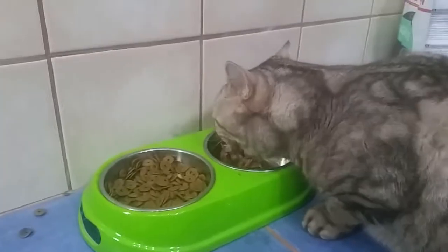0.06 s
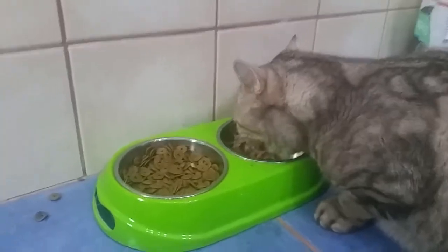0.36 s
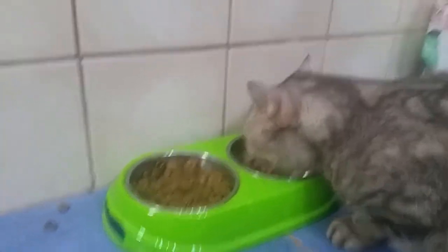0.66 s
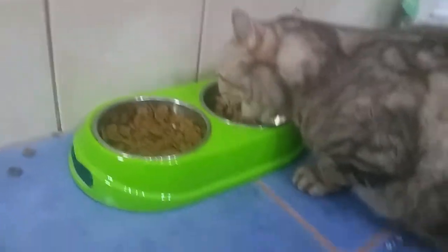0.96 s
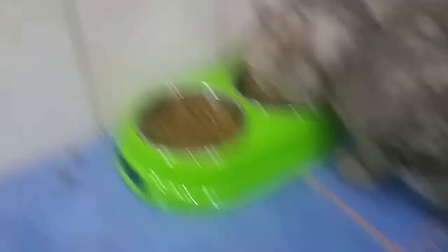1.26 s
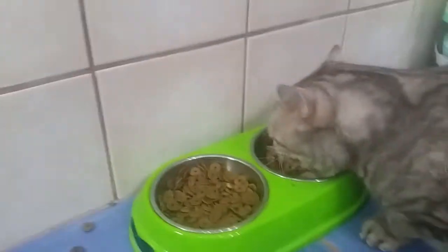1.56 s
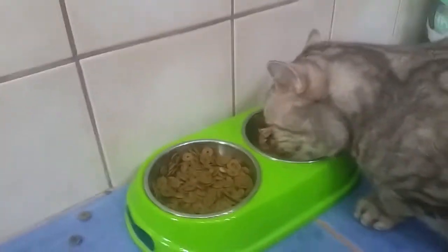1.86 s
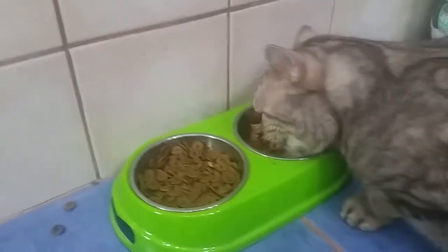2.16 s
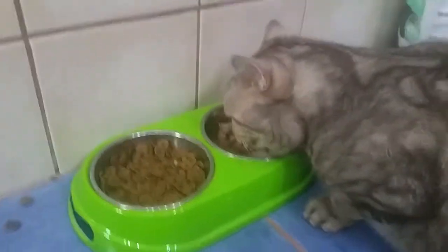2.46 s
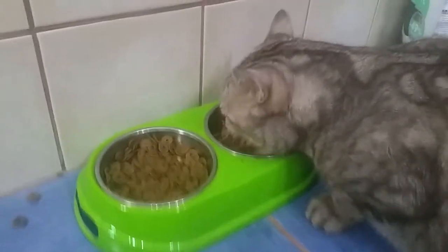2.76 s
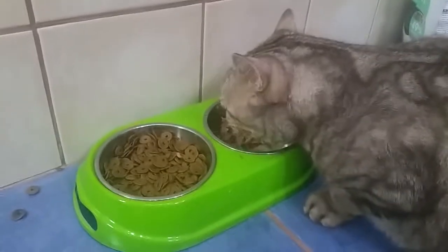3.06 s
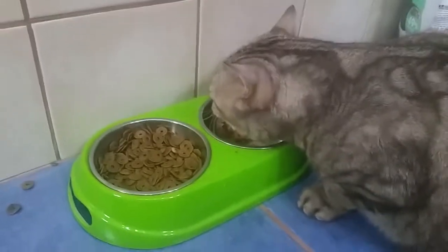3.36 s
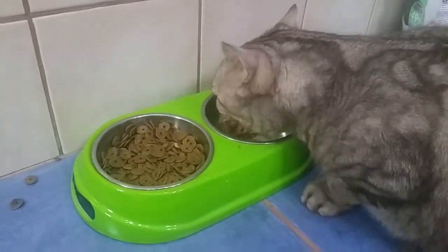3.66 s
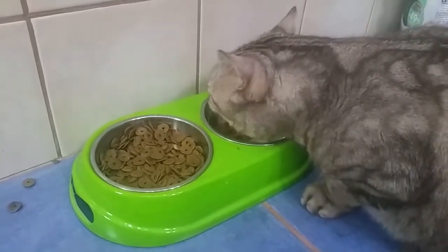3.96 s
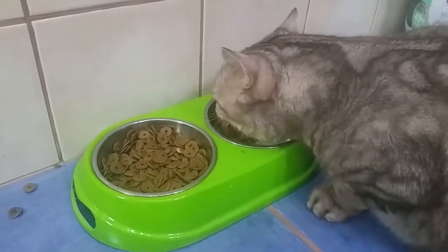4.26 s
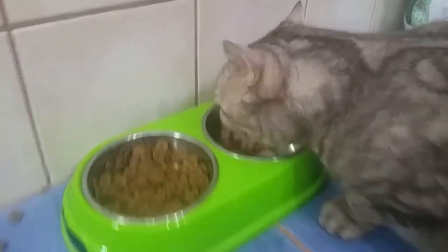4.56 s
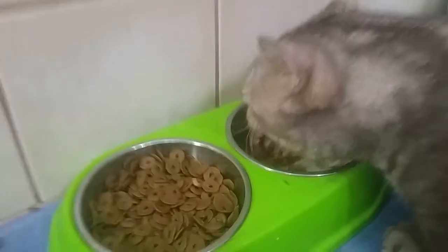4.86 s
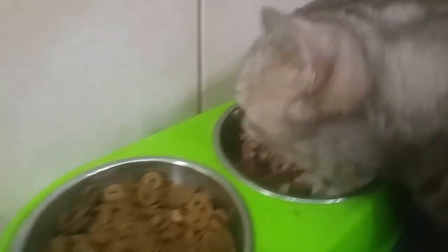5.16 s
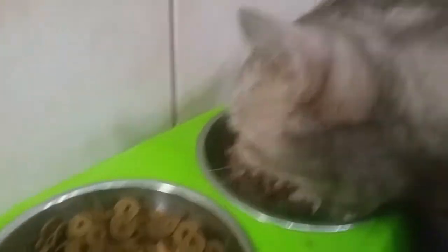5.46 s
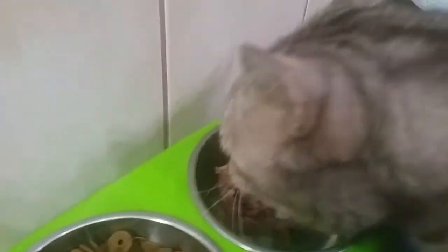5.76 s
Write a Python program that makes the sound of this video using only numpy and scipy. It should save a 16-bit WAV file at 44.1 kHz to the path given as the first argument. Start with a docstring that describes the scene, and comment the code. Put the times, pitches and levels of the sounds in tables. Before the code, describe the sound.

Loud, close microphone handling with rubs and thumps covers the faint ticks of a cat eating kibble, over soft hiss.

```python
"""Fingers on a phone, a cat eating

A cat eats quietly from a steel bowl in a tiled room: kibble (dry food) ticks and scrapes in the bowl.
Far louder, fingers shift on a hand-held phone. They rub, stick and slip, squeak and bump beside its
two microphone holes, called ports. A small metal part pings now and then over a soft, steady hiss."""
import sys
import numpy as np
from scipy import signal
from scipy.fft import rfft, irfft, next_fast_len
from scipy.io import wavfile
from scipy.ndimage import uniform_filter1d, map_coordinates

SR = 44100
rng = np.random.default_rng(int(sys.argv[2]) if len(sys.argv) > 2 else 0)


def transcribe(u):
    """Save the signal u as a 16-bit wav file named by the first command-line argument.

    u: samples, shape (n,) or (channels, n), limited to [-1, 1]; the rate is SR.
    q: integer samples, one column per channel.
    """
    v = np.clip(np.atleast_2d(u).T, -1, 1)
    q = np.round(v * 32767).astype(np.int16)
    wavfile.write(sys.argv[1], SR, q)


N = 265566

# Levels are relative: later gains set the mix. A ring_s is the time a sound takes to fade by 60 dB.
# A pan_db is left minus right, so a positive one leans left.

# tone of the room and microphone hiss: frequency_hz, left_db, right_db
HISS_TONE = [(25, 5.5, -1), (60, 1.5, 2), (148, -11, -5), (413, -19, -17), (770, -23, -27.5),
             (1300, -37.5, -40.5), (2000, -21, -31), (2660, -29.5, -34.5), (3220, -20.5, -30),
             (3960, -10, -29), (4850, -29.5, -32), (5860, -42, -45.5), (8500, -54.5, -58.5),
             (12000, -40.5, -53.5), (15500, -40.5, -44)]
# the hiss swells and sinks: time_s, level_db
HISS_SWELL = [(0, -9), (.4, 5.5), (1.5, 7.5), (2.2, 2.5), (2.7, 9), (3.5, 3.5), (4.2, -3), (4.7, 6.5),
              (6, 7.5)]
# how long the tiled walls echo: frequency_hz, ring_s
TILE_ECHO = [(300, 0.44), (4000, 0.27), (7000, 0.72), (14000, 0.68)]
# jolts of a small metal part: start_s, level_db
PINGS = [(1.6898, -43), (2.121, -44.5), (2.3715, -36.5)]
# the notes that part rings with: pitch_hz, level_db, ring_s
METAL_NOTES = [(12630, -7, .12), (13388, -5.5, .3)]
# teeth and kibble hit the bowl: start_s, level_db, fade_s
KIBBLE_HITS = [(2.7163, -25.5, 0.0022), (2.7198, -26, 0.003), (2.725, -19.5, 0.0025),
               (2.891, -35.5, 0.0045), (2.917, -42.5, .014), (2.959, -46, .01), (2.981, -37.5, 0.0043),
               (3.0904, -35, 0.0017), (3.356, -46, 0.0056), (3.457, -49.5, 0.025), (4.051, -51, 0.0025)]
# tone of the food-filled steel bowl: frequency_hz, level_db
BOWL_TONE = [(500, -39), (1900, -13.5), (2900, -24.5), (3700, -8.5), (4150, -0.5), (5000, -5.5),
             (6000, -6.5), (7500, -10.5), (8400, -27), (16000, -50.5)]

# how each port colours the sound: frequency_hz, left_db, right_db
PORT_TONE = [(928, -1.5, -4), (2547, -8.5, -2.5), (3830, 2.5, 6.5), (5200, -11.5, -0.5), (8530, -19.5, -16),
             (11100, -7, 3), (15000, 2, 5.5)]
# tones of rubbing skin, from deep rumble to bright fizz: frequency_hz, level_db
RUMBLE_TONE = [(15, -25), (40, 2.5), (130, 3), (220, -4), (400, -16), (1200, -74.5)]
SKIN_TONE = [(100, -24), (280, -3), (450, -0.5), (800, -12), (1400, -24.5), (3000, -59.5)]
LEFT_SWISH_TONE = [(300, -10.5), (900, 1.5), (1600, 9), (2600, 1.5), (4000, -5.5), (6000, -28),
                   (15000, -36.5)]
RIGHT_SWISH_TONE = [(30, 6), (200, 6), (700, 4), (1700, -1.5), (2800, -10.5), (4200, -18.5), (7000, -30.5),
                    (15000, -37.5)]
FIZZ_TONE = [(2000, -29), (5000, -1.5), (8000, -1.5), (12000, -3.5), (16000, -2)]
# tones of a scuff and of the rasp in a squeak: frequency_hz, level_db
SCUFF_TONE = [(300, 4.5), (1500, 1), (4000, -6.5), (8000, 3), (15000, -16.5)]
RASP_TONE = [(200, -5.5), (1100, 3), (2000, -8), (4000, -22.5), (8000, -40.5)]
# in a bump, soft flesh dulls the treble and the leaky port drains the bass: frequency_hz, level_db
BUMP_TONE = [(20, -18), (200, -1), (500, 0), (4200, -2.5), (8000, -2), (15000, -8.5)]
# the holding hand never quite rests: time_s, rumble_db
GRIP = [(0, -53), (1.5, -59.5), (2.25, -60), (2.55, -50.5), (3.1, -55.5), (3.6, -69), (4.42, -73),
        (4.75, -52), (6, -47)]
# one long drag of the fingers over the case: time_s, rub_db, swish_db, fizz_db
DRAG = [(0, -40, -63, -93), (.29, -52.5, -68.5, -96), (.35, -39, -64.5, -84.5), (.43, -40.5, -56, -68),
        (.52, -22.5, -41, -54), (.57, -23, -41.5, -53), (.615, -39, -47, -62.5), (.665, -22.5, -48.5, -57),
        (.71, -47, -61, -69), (.77, -41, -54, -66.5), (.87, -26.5, -50.5, -67.5),
        (.89, -29.5, -41.5, -66.5), (.97, -19.5, -44.5, -65), (1.03, -29.5, -47, -66.5),
        (1.2, -26, -41.5, -54), (1.23, -36.5, -37, -53.5), (1.305, -39.5, -34, -44.5),
        (1.335, -26.5, -35.5, -46), (1.368, -18, -27, -47), (1.385, -51.5, -59, -59.5),
        (1.5, -71, -61, -68), (2, -84.5, -91.5, -95)]
# short finger strokes: peak_s, rise_s, fall_s, rub_db, rub_pan_db, swish_db, fizz_db
STROKES = [(1.645, .04, .07, -50.5, 2, -65, -65.5), (2.04, .035, .045, -50.5, -2.5, -76, -58.5),
           (2.41, .02, .04, -51, 4.5, -61.5, -58.5), (2.5, .04, .06, -48, 1, -71, -70),
           (2.98, .035, .035, -45, 0, -57, -68), (3.37, 0.048, .035, -51, 2.5, -67, -71),
           (4.585, .025, 0.062, -37, -18, -62, -57.5), (4.72, 0.043, .045, -39, 25, -54, -58.5),
           (4.901, 0.076, .035, -37.5, 25, -46, -62), (5.14, 0.027, .04, -41, 17, -54.5, -68),
           (5.22, 0.029, 0.036, -42, 12, -58, -63.5), (5.409, 0.082, .045, -44.5, 17, -42.5, -87),
           (5.62, 0.042, .04, -43, 21, -45, -67.5), (5.733, 0.042, .05, -47.5, 20, -41, -83)]
# dry skin scuffs the right port: peak_s, level_db, half_length_s
SCUFFS = [(0.561, -47, 0.0054), (1.2513, -24.5, 0.00036), (2.375, -39.5, 0.0019), (2.385, -33.5, 0.0046),
          (2.985, -48, 0.0069), (4.5145, -32.5, 0.0008), (4.53, -26.5, 0.00092), (4.553, -48, 0.014),
          (4.597, -41.5, 0.033), (4.637, -35.5, 0.002), (5.5642, -38, 0.00079)]
# a fingertip squeaks across the left port, one list per squeak: time_s, pitch_hz, level_db
SQUEAKS = [
    [(.503, 620, -20), (.515, 768, -24), (.53, 683, -26.5)],
    [(.952, 460, -30.5), (.971, 546, -14.5), (.984, 462, -42), (1.005, 430, -23.5)],
    [(1.314, 240, -15), (1.326, 328, -12), (1.338, 439.6, -9), (1.346, 710, -15), (1.354, 908, -10.5),
     (1.36, 1108, -19), (1.371, 1426, -23)],
]
# a fingertip sticks and slips in runs:
# start_s, slip_count, first_gap_s, gap_ratio, first_slip_db, growth_per_slip_db, pan_db, snap_vs_swing_db
SLIP_RUNS = [(.4345, 10, .012, 1, -16.5, 0.14, 4, -8), (0.5574, 3, 0.013, 1.05, -2, 0.5, 8, -4.5),
             (0.6401, 5, 0.0077, 1.21, -3, 0.62, 7.5, -1), (.705, 2, .016, 1, -13.5, 8, 18, -13.5),
             (1.0583, 2, .0218, 1, -15.5, 5, -1, 0), (1.1078, 6, .011, .9, -13, 1.5, 2.5, 1)]
# the notes the phone's case rings with: pitch_hz, level_db, ring_s
CASE_NOTES = [(417.3, 0.5, 0.056), (540, -4.5, 0.035), (810, -6, 0.032), (970, -10, 0.021),
              (1374, -4, 0.016), (1650, -10, 0.036), (2120, -23, 0.025)]
# fingers bump the case: start_s, swing_hz, swing_db, pan_db, snap_corner_hz, snap_db
BUMPS = [(1.036, 403, -15, 30, 400, -18.5), (1.1945, 140, -5, 34, 203.3, -6),
         (1.238, 82.5, -10, 35, 1000, -21), (1.2521, 300, -38, 18, 1300, -13.5),
         (1.3138, 248, 1.5, 46, 201, 0), (1.6411, 152, -28, -5.5, 890, -29),
         (2.3678, 104, -0.5, -19, 300, -9.5), (2.3706, 350, -14, -6, 301, -25),
         (2.3713, 121, 2, -18, 503, -9), (2.3843, 88, -1.5, -14.5, 650, -14),
         (2.5276, 70.8, 1.5, 22, 195, -9.5), (2.5644, 60, -22.5, 7.5, 538, -36),
         (2.748, 290, -29.5, 6, 325, -25.5), (2.8672, 77.5, 2.5, 9.5, 2280, -19),
         (2.8922, 95, -12, -30, 876, -25), (2.962, 103, -9, -18.5, 1330, -36),
         (2.9885, 204, -25.5, -3.5, 1474, -36), (3.038, 250, -33.5, 2, 600, -50),
         (3.2756, 80, .5, 6, 2600, -18.5), (3.3676, 110, -28, -1, 2100, -27),
         (4.271, 248.2, -54, -13.5, 420, -42.5), (4.443, 206.5, -36, -20.5, 1920, -38),
         (4.5224, 99, -25, -15, 780, -20), (4.5289, 166, -3, -15.5, 186, -4.5),
         (4.631, 156, -11.5, -31, 530, -12.5), (4.6355, 97, -20, 1, 700, -10.5),
         (4.6852, 467, -20, 30, 201, -13.5), (4.7006, 420, -33, 26, 456, -9.5),
         (4.865, 170, -24, 31, 540, -24), (4.878, 96.5, -23, -18, 1147, -29),
         (5.0012, 400, -62, 19, 405, -25), (5.0991, 137, -31, -13, 262, -22.5),
         (5.133, 78, -16.5, 34, 240, -13.5), (5.1978, 447, -27, 24, 300, -20.5),
         (5.3, 79, -20, 31, 1146, -30), (5.5501, 456, -47, 0, 213, -22.5), (5.5565, 394, -9, 23, 377, -3.5),
         (5.568, 109, -15.5, 30, 200, -17), (5.599, 565, -27, 27, 203, -11),
         (5.813, 59.6, -29, 20, 200, -48), (5.851, 127, -23.5, 25, 405, -20),
         (6.0083, 118, -28, 15, 1891, -34.5)]


def amp(db):
    """Turn decibels into a gain to multiply by."""
    return 10 ** (np.asarray(db) / 20)


def unit(x):
    """Scale a sound to an average (rms) strength of 1."""
    return x / np.sqrt(np.mean(x ** 2) + 1e-20)


def along(points, hz, column=1):
    """Read a table between its rows, with frequency spaced in octaves."""
    table = np.transpose(points)
    return np.interp(np.log(hz + 1), np.log(table[0] + 1), table[column])


def per_port(points, hz):
    """Left and right gains from a tone table."""
    return amp([along(points, hz, 1), along(points, hz, 2)])


def pan(pan_db):
    """Left and right gains: the nearer port gets it all, the other gets less."""
    return amp([[min(pan_db, 0)], [min(-pan_db, 0)]])


def curves(rows):
    """Join a table's points in time: one curve for each column after the first."""
    times, *columns = np.transpose(rows)
    return [np.interp(np.arange(N) / SR, times, column) for column in columns]


def wobble(rate):
    """A smooth curve through `rate` random points a second."""
    points = rng.standard_normal(int(N * rate / SR) + 4)
    return map_coordinates(points, [np.arange(N) * rate / SR])


def filtered(x, response):
    """Multiply each frequency in a sound by response(hz)."""
    size = 2 * next_fast_len(N // 2 + SR // 4)
    return irfft(rfft(x, size) * response(np.fft.rfftfreq(size, 1 / SR)), size)[..., :N]


def causal(gain):
    """Turn gains into a filter that never sounds before the hit (minimum phase)."""
    cepstrum = irfft(np.log(gain))
    half = cepstrum.shape[-1] // 2
    cepstrum[..., 1:half] *= 2
    cepstrum[..., half + 1:] = 0
    return np.exp(rfft(cepstrum))


def add(track, start_s, sound):
    """Mix a sound into a track from start_s on."""
    part = track[..., round(start_s * SR):][..., :sound.shape[-1]]
    part += sound[..., :part.shape[-1]]


def hiss():
    """Room murmur and microphone hiss, slowly swelling and sinking."""
    noise = filtered(rng.standard_normal((2, N)), lambda hz: per_port(HISS_TONE, hz))
    return amp(-59.5 + curves(HISS_SWELL)[0]) * unit(noise)


def whine(pitch_hz=14000, width_hz=110):
    """A faint, thin whine: a narrow band of very high noise."""
    noise = rng.standard_normal((2, N))
    return amp(-88.5) * unit(filtered(noise, lambda hz: np.exp(-((hz - pitch_hz) / width_hz) ** 2)))


def room_echo(x):
    """The tiled walls throw a sound back, differently at each port."""
    hz, t, spectrum = signal.stft(rng.standard_normal((2, SR)), SR, nperseg=256)
    fade = amp(-60 * t / along(TILE_ECHO, hz)[:, None])
    tail = signal.istft(spectrum * fade, SR, nperseg=256)[1]
    return signal.fftconvolve(x[None], tail / np.linalg.norm(tail[0]), axes=1)[:, :N]


def metal_pings():
    """A tiny metal part ticks and rings very high after each jolt."""
    out, t = np.zeros(N), np.arange(SR // 2) / SR
    ring = sum(amp(db - 60 * t / ring_s) * np.sin(2 * np.pi * hz * t) for hz, db, ring_s in METAL_NOTES)
    for start_s, db in PINGS:
        bright_noise = np.diff(rng.standard_normal(len(t) + 3), 3)
        tick = .1 * np.exp(-t / .004) * bright_noise
        add(out, start_s, amp(db) * (ring + tick))
    return out * amp([[-9], [-3]])


def rim_clink(start_s=.1405, pitch_hz=2300, ring_s=.25):
    """A light touch makes the bowl's bare rim ring."""
    out, t = np.zeros(N), np.arange(SR // 2) / SR
    tick = 8 * np.exp(-t / .003) * rng.standard_normal(len(t))
    ring = amp(-60 * t / ring_s) * np.sin(2 * np.pi * pitch_hz * t)
    add(out, start_s, amp(-61) * (ring + uniform_filter1d(tick, size=8)))
    return out


def nibbles(per_second=5.7, level_db=-58.5, spread_db=3, fade_s=.0015):
    """Faint ticks of food at random moments: start_s, level_db, fade_s."""
    draws = rng.random((round(per_second * N / SR), 2))
    return [(when * N / SR, level_db + spread_db * (2 * size - 1), fade_s) for when, size in draws]


def kibble():
    """Short grainy scrapes in the steel bowl; the food stops it from ringing on."""
    scrapes, t = np.zeros(N), np.arange(SR // 8) / SR
    for start_s, db, fade_s in KIBBLE_HITS + nibbles():
        add(scrapes, start_s, amp(db) * rng.standard_normal(len(t)) * np.exp(-t / fade_s))
    scrapes *= amp(3.5 * wobble(700))
    return amp(7.5) * filtered(scrapes, lambda hz: causal(amp(along(BOWL_TONE, hz))))


def friction(tone, grain_db, grain_rate):
    """Noise that comes in clumps, as skin ridges catch and let go."""
    grains = rng.standard_normal(N) * amp(grain_db * wobble(grain_rate))
    return unit(filtered(grains, lambda hz: amp(along(tone, hz))))


def low_rub(rumble_gain, skin_gain):
    """Skin right on a port: the case rumbles under a grainy rub."""
    rumble = rumble_gain * friction(RUMBLE_TONE, grain_db=0, grain_rate=66)
    return rumble + skin_gain * friction(SKIN_TONE, grain_db=3, grain_rate=150)


def stroke_gains():
    """Each stroke swells and dies away: gains of left rub, right rub, swish and fizz."""
    t, gains = np.arange(N) / SR, np.zeros((4, N))
    for peak_s, rise_s, fall_s, rub_db, pan_db, swish_db, fizz_db in STROKES:
        from_peak = np.abs((t - peak_s) / np.where(t < peak_s, rise_s, fall_s))
        peaks = np.vstack([amp(rub_db) * pan(pan_db), amp(swish_db), amp(fizz_db)])
        gains += peaks * np.exp(-from_peak ** 1.5)  # power 1 is a pointed swell, 2 a rounded one
    return gains


def rubbing():
    """Drag, strokes and grip all slide skin over the ports; the left one is nearly covered."""
    drag = amp(curves(DRAG))
    grip = amp(curves(GRIP)[0] + 2 * wobble(8.1))
    left_rub, right_rub, stroke_swish, stroke_fizz = stroke_gains()
    strokes = np.array([left_rub, stroke_swish, stroke_fizz])
    resting = amp([[-11], [-15], [-29]]) * grip  # rub, swish, fizz
    skin, swish, fizz = np.sqrt(drag ** 2 + strokes ** 2 + resting ** 2)
    drag_flex, stroke_flex = amp(7), amp(1.5)  # a firm drag bends the case more, so it rumbles more
    close_rub = low_rub(drag_flex * drag[0] + stroke_flex * left_rub + grip, skin)
    left = close_rub + amp(3) * swish * friction(LEFT_SWISH_TONE, grain_db=2.5, grain_rate=250)
    right = amp(-25.5) * close_rub + low_rub(stroke_flex * right_rub, right_rub)
    open_swish = np.sqrt(swish * fizz)  # the open right port follows both swish and fizz
    right += amp(7) * open_swish * friction(RIGHT_SWISH_TONE, grain_db=4, grain_rate=95)
    left += amp(3) * fizz * friction(FIZZ_TONE, grain_db=4.5, grain_rate=910)
    right += amp(1) * fizz * friction(FIZZ_TONE, grain_db=3, grain_rate=400)
    return np.array([left, right])


def scuffs():
    """Brief bright rushes as a ridge of skin brushes by."""
    t = np.arange(N) / SR
    touch = sum(amp(db) * np.exp(-((t - peak_s) / half_s) ** 2) for peak_s, db, half_s in SCUFFS)
    return touch * friction(SCUFF_TONE, grain_db=6, grain_rate=900) * amp([[-20], [0]])


def squeaks():
    """Fast slips merge into a rough tone, which rises as the finger speeds up."""
    out, t = np.zeros(N), np.arange(N) / SR
    for rows in SQUEAKS:
        hz, db = curves(rows)
        start_s, end_s = rows[0][0], rows[-1][0]
        contact = np.clip(np.minimum(t - start_s, end_s - t) / .002, 0, 1)
        unsteady_hz = hz * np.exp(.13 * wobble(500))
        phase = 2 * np.pi * np.cumsum(unsteady_hz) / SR
        tone = np.sin(phase) + .15 * np.sin(2 * phase)
        rasp = amp(-10.5) * friction(RASP_TONE, grain_db=1, grain_rate=450)
        out += contact * amp(db + 2 * wobble(300)) * (tone + rasp)
    return out * amp([[1.5], [-23]])


def swing(hz, crest, sharpness):
    """Air pushed into a port swings in and out, strongest after `crest` cycles."""
    cycles = hz * np.arange(SR // 8) / SR
    age = cycles / crest
    return np.sin(2 * np.pi * cycles) * (age * np.exp(1 - age)) ** sharpness


def snap(corner_hz, grit, grit_s):
    """A touch sends out a pressure pulse with a gritty tail; a higher corner_hz makes it sharper."""
    t = np.arange(SR // 8) / SR
    age = 2 * np.pi * corner_hz * t
    pulse = age * np.exp(1 - age)
    crumbs = grit * rng.standard_normal(len(t)) * np.exp(-t / grit_s)
    return pulse + signal.fftconvolve(pulse, crumbs)[:len(t)]


def slips():
    """Each slip in a run is stronger than the last: start_s, level_db, pan_db, snap_db."""
    for start_s, count, gap_s, gap_ratio, db, growth_db, pan_db, snap_db in SLIP_RUNS:
        for k in range(round(count)):
            yield start_s, db + k * growth_db, pan_db, snap_db
            start_s += gap_s * gap_ratio ** k


def stick_and_slip():
    """Every slip snaps at the right port first, then at the left, and leaves a low swing of air."""
    left, right = np.zeros((2, N))
    right_swing = 1.4 * swing(110, crest=.15, sharpness=.45)
    left_swing = 1.06 * swing(90, crest=.15, sharpness=.37)
    for start_s, db, pan_db, snap_db in slips():
        right_snap = amp(snap_db + 2.5) * snap(320, grit=.056, grit_s=.0016)
        left_snap = amp(snap_db - 1) * snap(300, grit=.094, grit_s=.0031)
        add(right, start_s - .0004, amp(db - pan_db) * (right_swing - right_snap))
        add(left, start_s + .0008, amp(db) * (left_snap - left_swing))
    return np.array([left, right])


def case_ring():
    """A short hollow ring; every blow strikes the case's notes at new strengths."""
    t = np.arange(SR // 8) / SR
    ring = np.zeros(len(t))
    for hz, db, ring_s in CASE_NOTES:
        fade = amp(db + rng.normal(0, 1.7) - 60 * t / ring_s)
        ring += fade * np.sin(2 * np.pi * (hz * t + rng.random()))
    return ring * (1 - np.exp(-t / .0024))


def bumps():
    """A finger lands with a snap that rings the case, and the case pumps air into both ports."""
    air, blows = np.zeros((2, 2, N))
    for start_s, hz, db, pan_db, corner_hz, snap_db in BUMPS:
        settle = amp(-31) * swing(hz * .4, crest=.9, sharpness=2.3)  # the pressure evens out slowly
        left_swing = swing(hz, crest=.64, sharpness=2.8)
        right_swing = swing(hz * 1.12, crest=.35, sharpness=1.3)
        add(air, start_s, amp(db) * pan(pan_db) * (np.array([left_swing, right_swing]) + settle))
        muffle_db = 6 * max(np.log2(corner_hz / 300), 0)  # harder snaps lose more at the covered port
        snap_pan_db = .75 * pan_db - muffle_db  # the case spreads a snap more evenly than the air does
        snaps = [snap(corner_hz, grit=.067, grit_s=.0053) + amp(-21) * case_ring() for _ in range(2)]
        add(blows, start_s, amp(snap_db) * pan(snap_pan_db) * np.array(snaps))
    return air + filtered(blows, lambda hz: causal(amp(along(BUMP_TONE, hz))))


def scene():
    """The cat, the hand and the pings reach the two ports, over the hiss."""
    food = kibble()
    eating = food * amp([[-18], [-2]]) + room_echo(food) * amp([[-19], [-8]]) + rim_clink()
    hand = rubbing() + stick_and_slip() + bumps() + scuffs() + squeaks()
    at_ports = filtered(hand + eating + metal_pings(), lambda hz: causal(per_port(PORT_TONE, hz)))
    return at_ports + hiss() + whine()


def record(dry):
    """The phone drops the deepest bass, rounds off the loudest peaks and cuts the highest treble."""
    bass_cut_hz, peak_limit, top_hz = 18, .95, 15960
    trimmed = filtered(dry, lambda hz: 1j * hz / (bass_cut_hz + 1j * hz))
    rounded = trimmed / (1 + (trimmed / peak_limit) ** 6) ** (1 / 6)
    return filtered(rounded, lambda hz: hz < top_hz)


dry = scene()
out = record(dry)
transcribe(out)
```